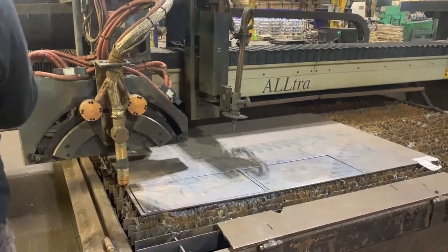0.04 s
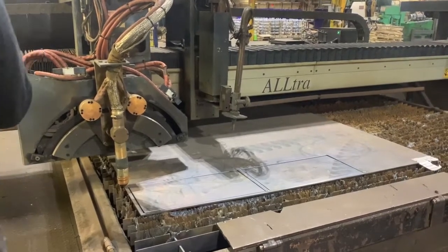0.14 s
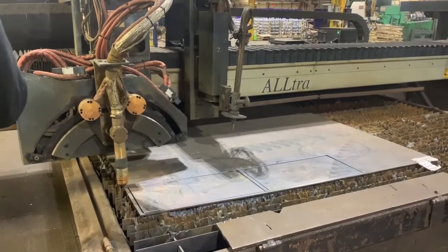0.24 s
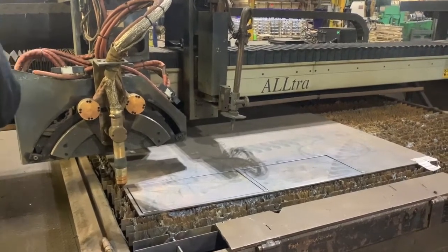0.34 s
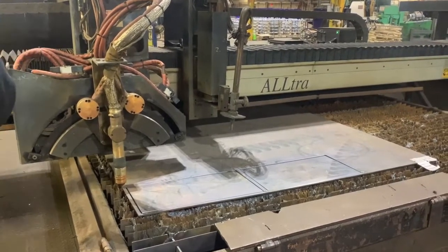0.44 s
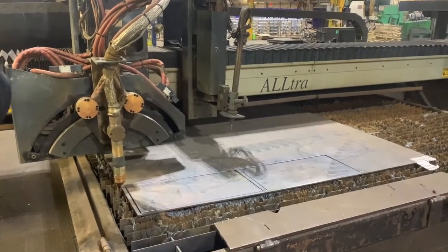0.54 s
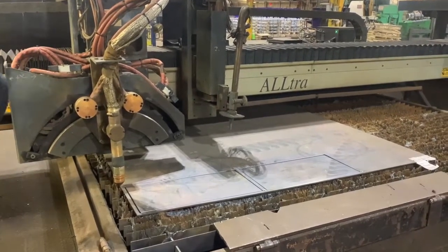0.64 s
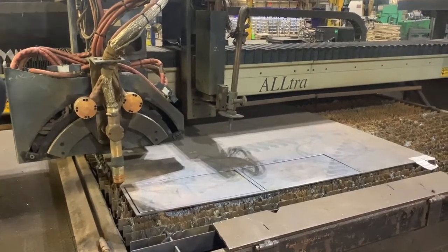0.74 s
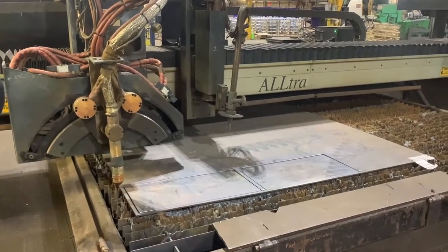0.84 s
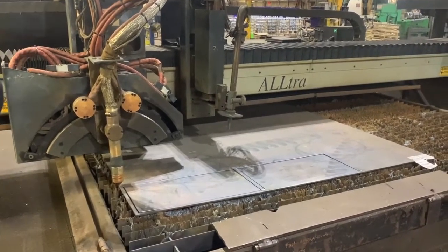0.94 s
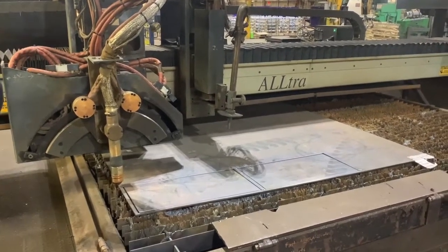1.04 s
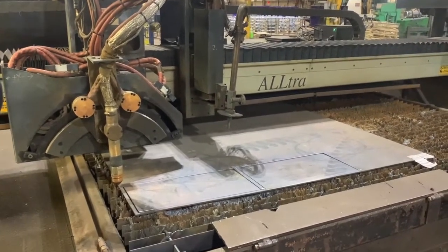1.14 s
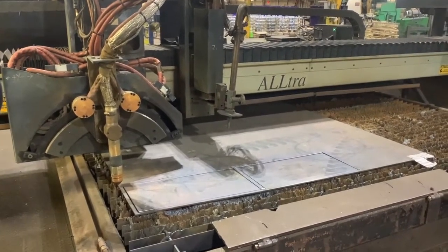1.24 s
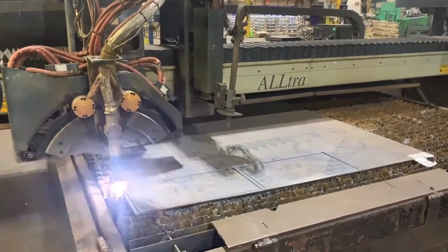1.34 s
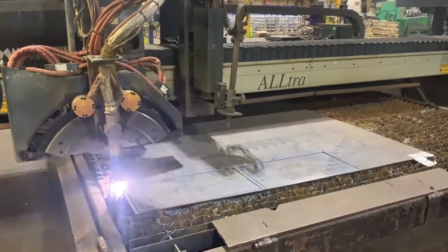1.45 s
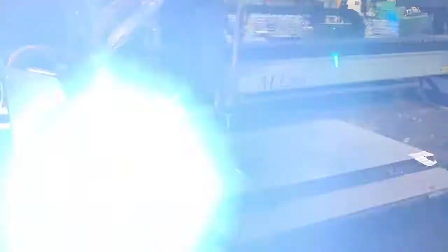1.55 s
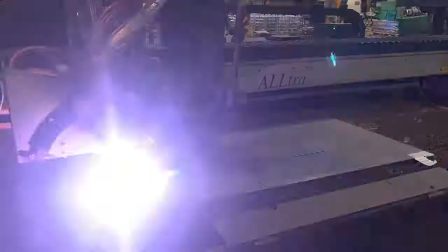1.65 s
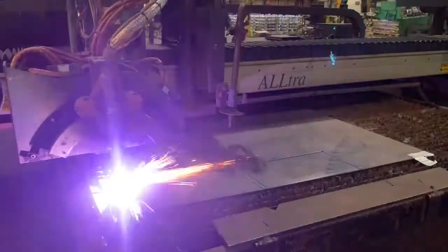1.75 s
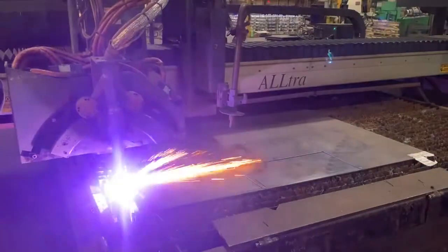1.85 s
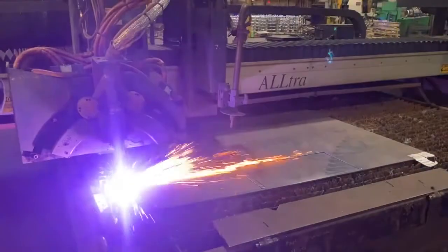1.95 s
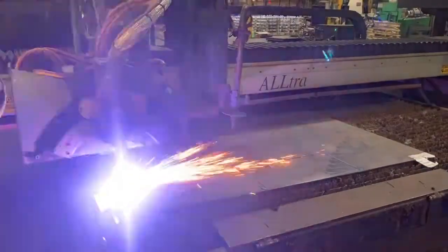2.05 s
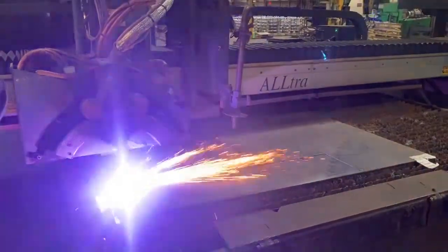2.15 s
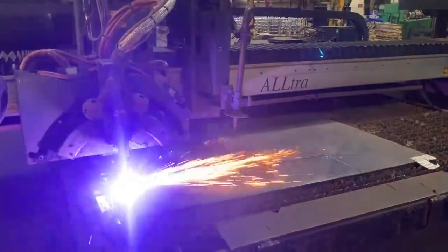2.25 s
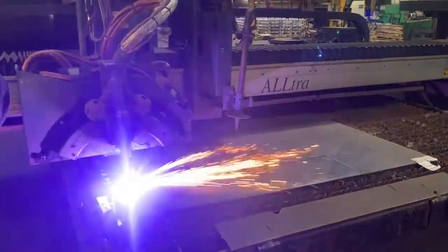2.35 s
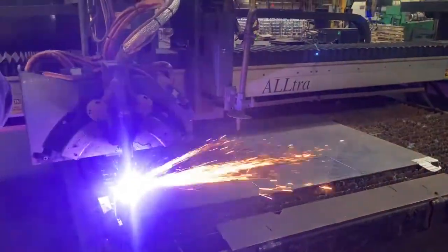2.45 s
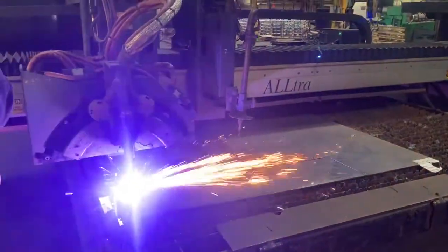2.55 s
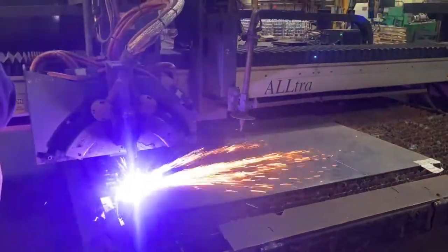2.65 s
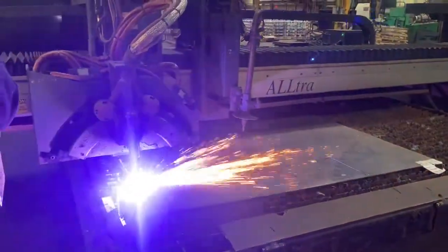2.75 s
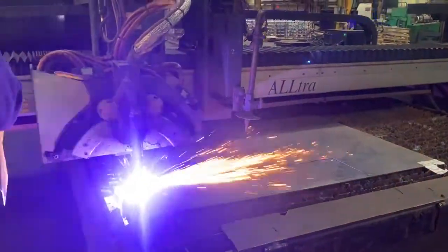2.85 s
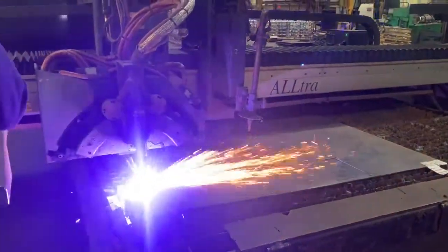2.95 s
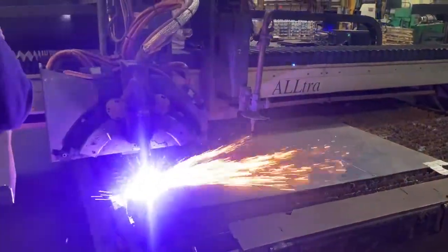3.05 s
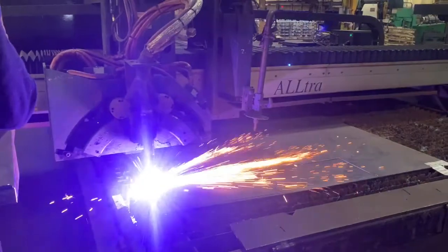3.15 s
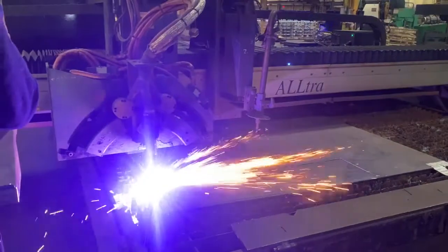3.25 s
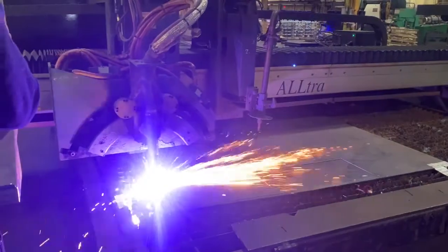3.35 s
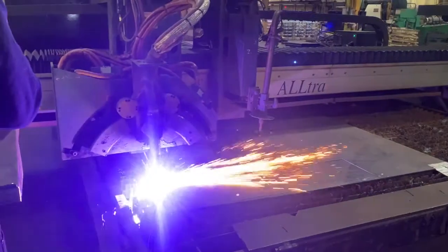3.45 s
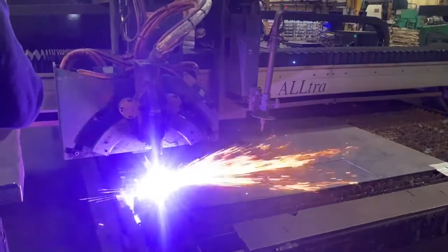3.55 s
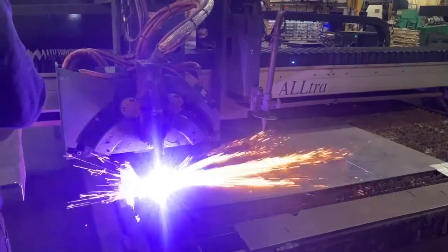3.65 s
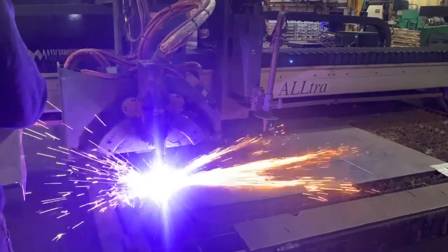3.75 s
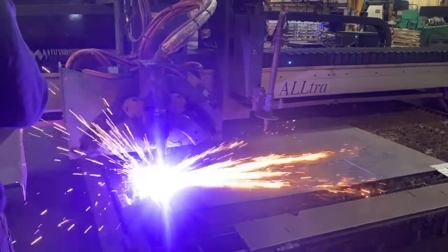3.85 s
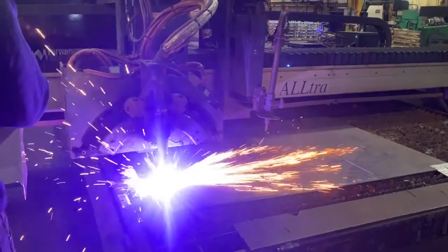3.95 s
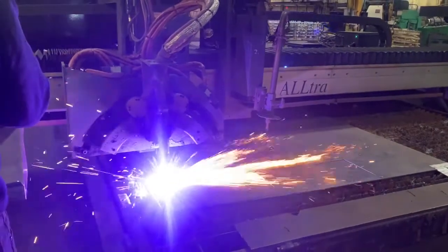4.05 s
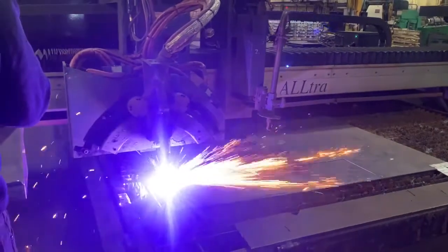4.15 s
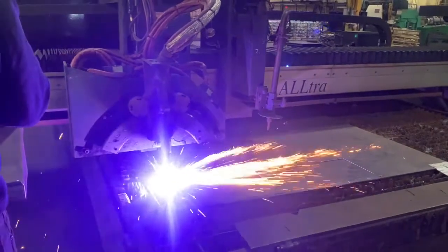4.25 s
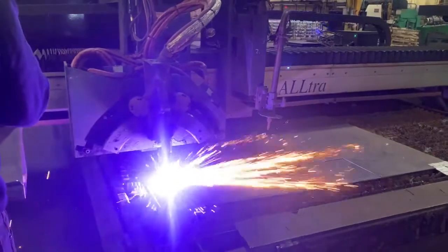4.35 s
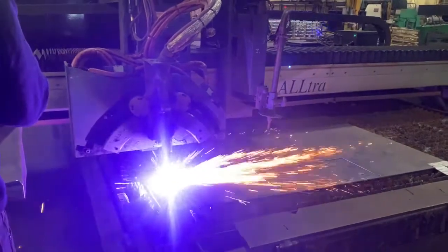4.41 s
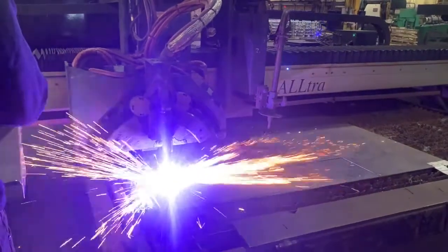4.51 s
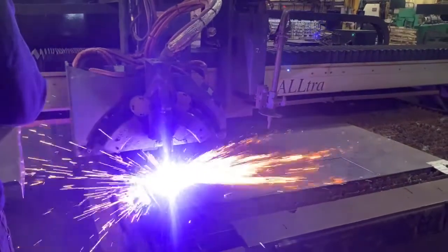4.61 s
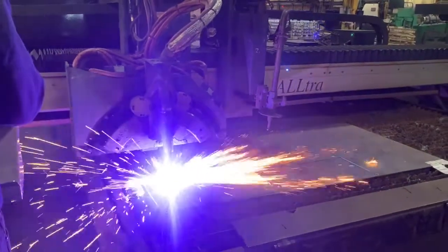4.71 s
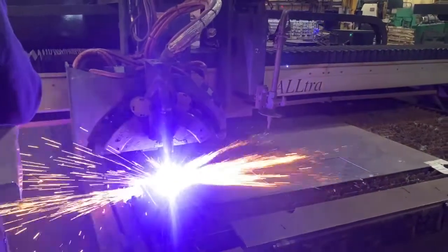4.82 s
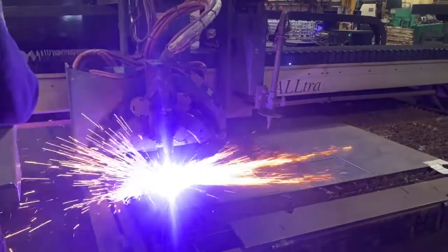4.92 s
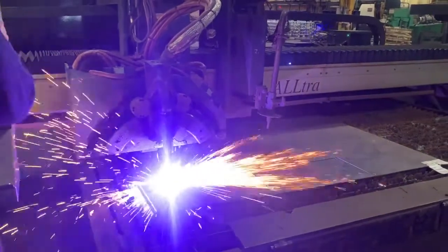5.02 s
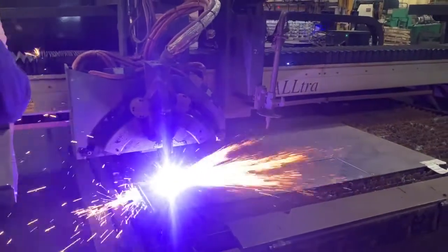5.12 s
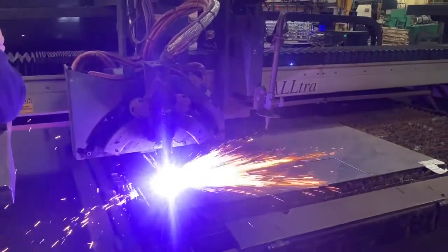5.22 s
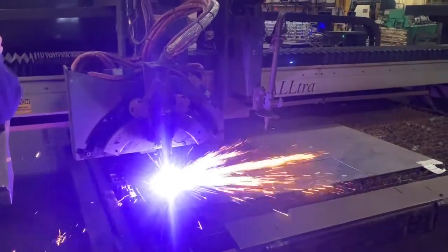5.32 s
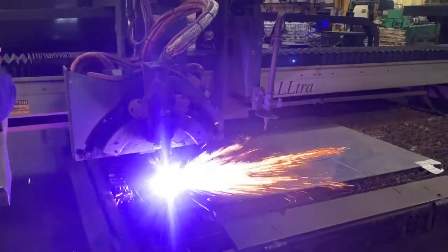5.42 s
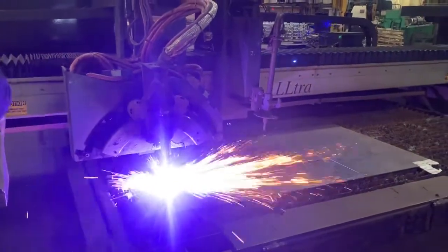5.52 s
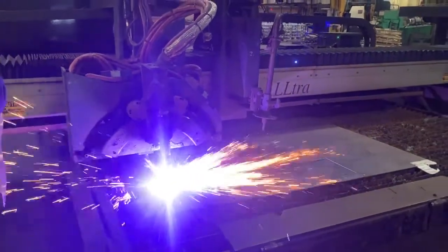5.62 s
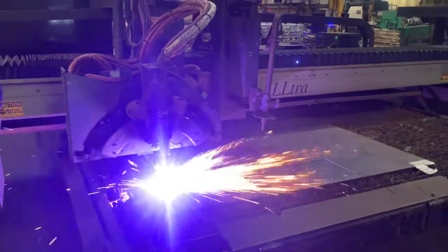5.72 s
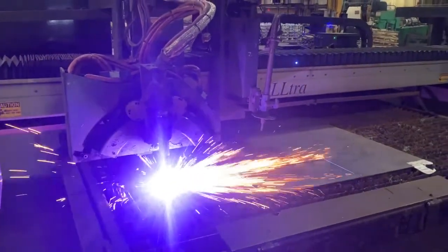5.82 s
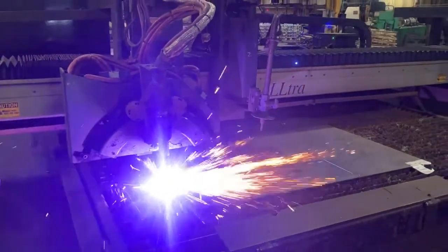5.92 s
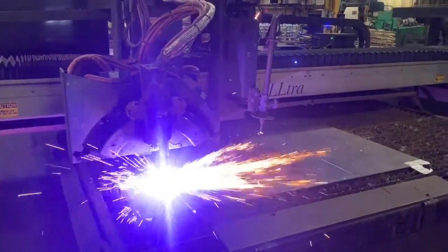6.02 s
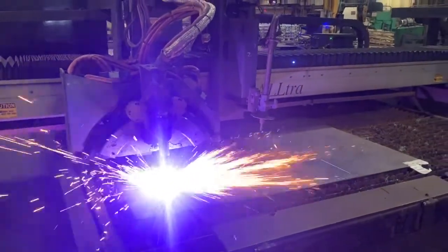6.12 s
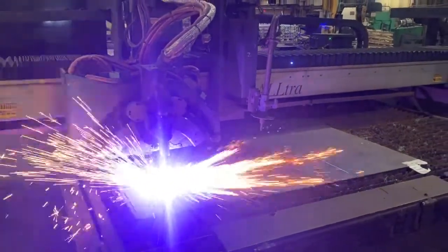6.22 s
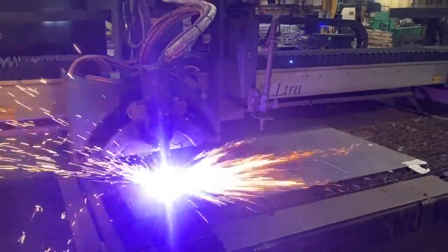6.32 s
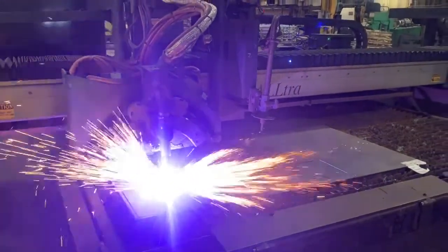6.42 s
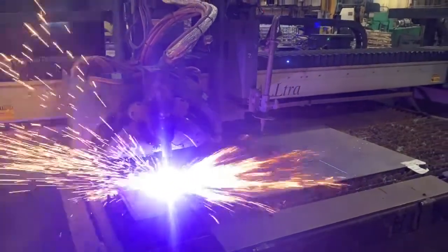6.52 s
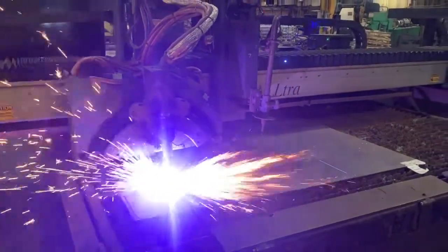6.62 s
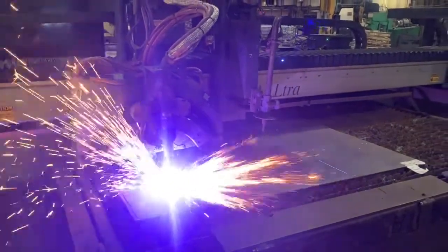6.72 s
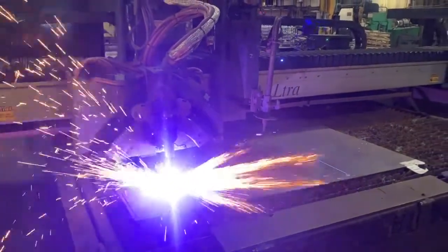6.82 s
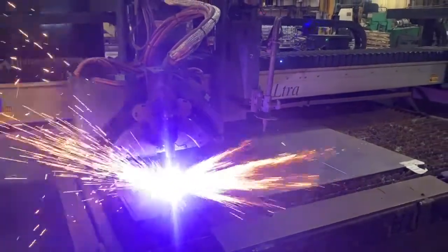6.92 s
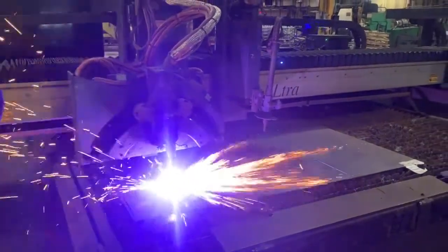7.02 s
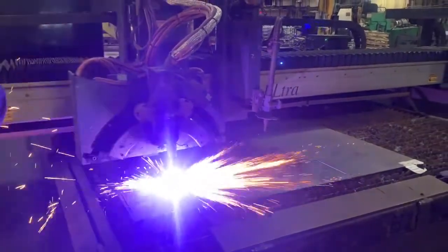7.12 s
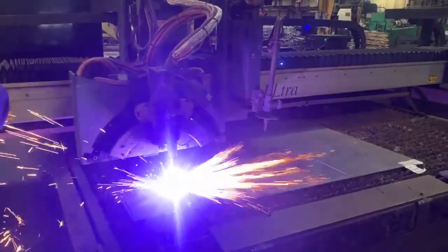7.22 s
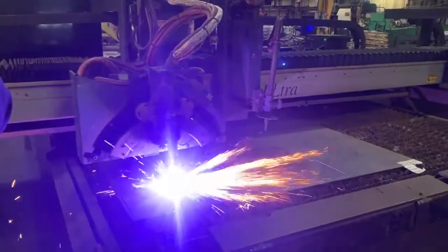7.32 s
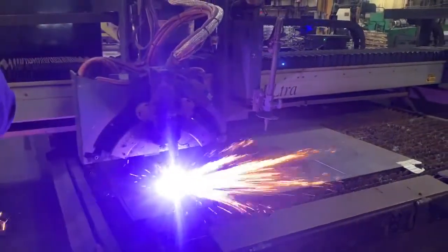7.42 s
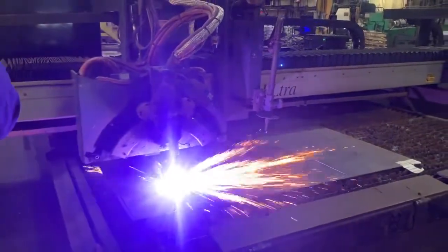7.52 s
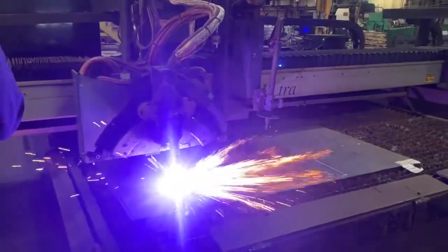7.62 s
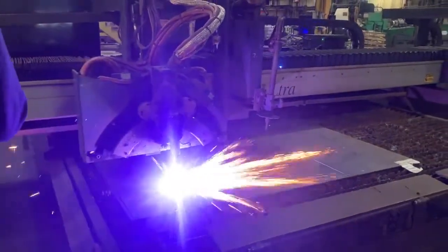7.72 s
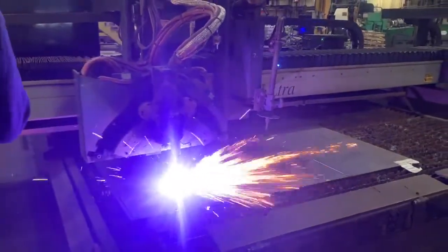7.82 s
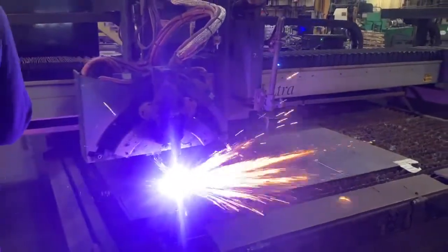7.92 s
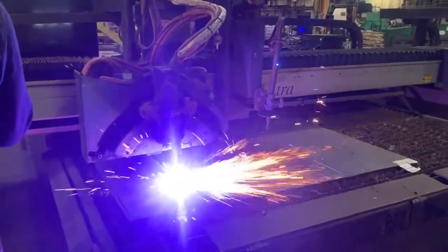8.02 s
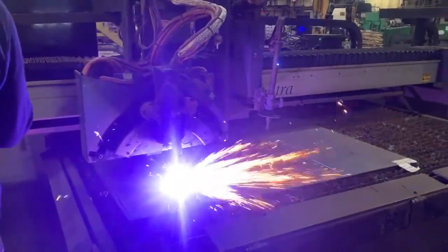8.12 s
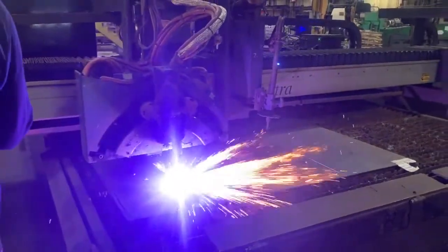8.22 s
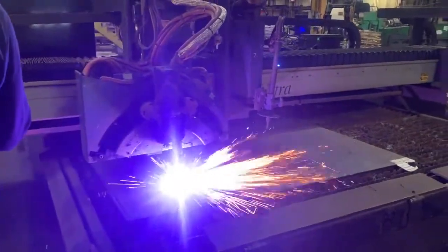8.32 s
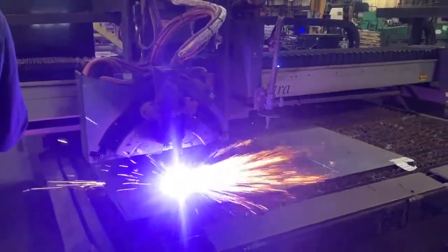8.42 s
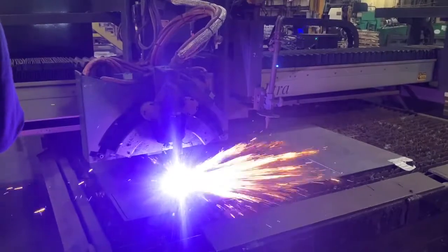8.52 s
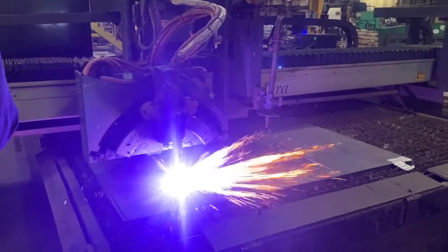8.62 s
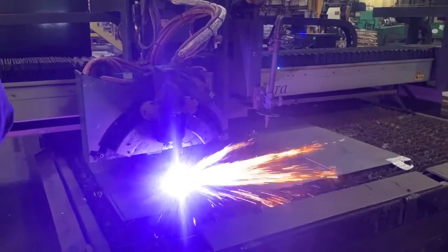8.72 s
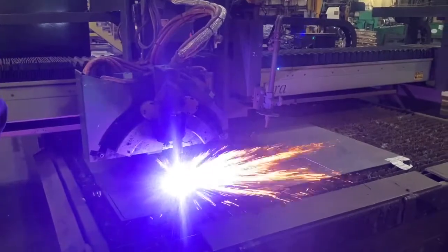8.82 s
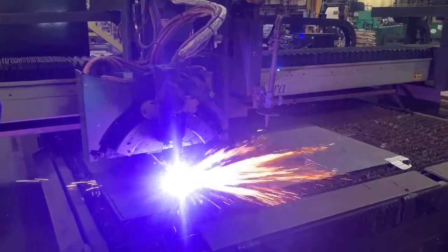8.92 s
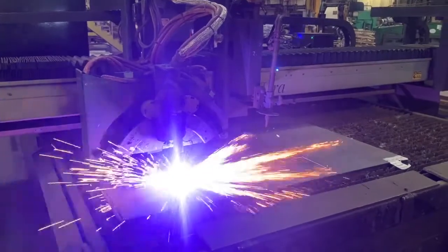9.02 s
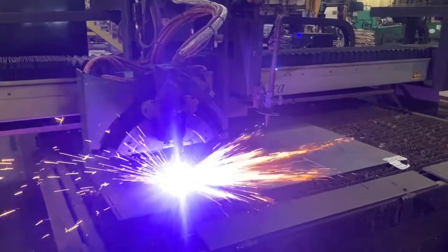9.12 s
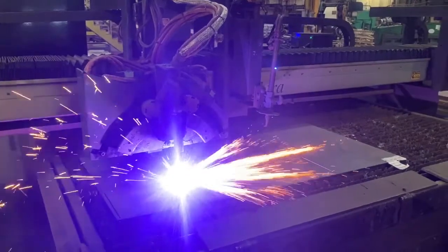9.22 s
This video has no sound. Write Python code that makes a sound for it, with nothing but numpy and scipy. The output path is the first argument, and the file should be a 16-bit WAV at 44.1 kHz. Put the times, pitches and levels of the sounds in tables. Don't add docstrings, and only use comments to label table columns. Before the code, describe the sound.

Cold gas hisses from a nozzle over deep machine rumble while a motor whine swells and stops. The torch ignites with an abrupt, splashy blast, uneven at first, then cuts steel plate continuously: sharp airy hiss, a shrill buzzing squeal and a faint hollow roar. One soft slag thud comes late. Indoor workshop, small stereo device nearby, automatic gain pushing the rumble down.

```python
import sys
import numpy as np
from scipy import signal
from scipy.fft import rfft, irfft, next_fast_len
from scipy.io import wavfile
from scipy.ndimage import uniform_filter1d

SR = 44100
rng = np.random.default_rng(int(sys.argv[2]) if len(sys.argv) > 2 else 0)


def convert_level_to_amplitude(level_db):
    exponent = np.asarray(level_db, float) / 20
    return 10 ** exponent


def dump_mix(stems):
    frames = np.atleast_2d(stems).T
    limited = np.clip(frames, -1, 1)
    pcm = np.round(limited * 32767).astype(np.int16)
    wavfile.write(sys.argv[1], SR, pcm)


N = 408366
TIME = np.arange(N) / SR
HZ = np.fft.rfftfreq(1024, 1 / SR)
FRAMES = np.arange(N // 256 + 5) * 256 / SR
STRIKE_S, PIERCED_S = 1.307, 3.4
CUT_POWER_DB = -38.5


def evened(x):
    return x / np.sqrt(np.mean(x ** 2) + 1e-20)


def curve(rows, t=TIME):
    s, *columns = np.transpose(rows)
    return [np.interp(t, s, c) for c in columns]


def wander(t, seconds):
    span = max(round(seconds / t[1]), 1)
    drift = uniform_filter1d(rng.standard_normal(len(t)), span)
    return evened(uniform_filter1d(drift, span))


def colour(points):
    f, db = np.transpose(points)
    at, f = np.log(HZ + 1), np.log(f)
    beyond = np.maximum(f[0] - at, 0) + np.maximum(at - f[-1], 0)
    return (np.interp(at, f, db) - 14 * beyond)[:, None]


def noise(field_db, patchy_db):
    a, b, c, d, patches = rng.standard_normal((len(FRAMES), 513, 5)).T
    patches = evened(uniform_filter1d(uniform_filter1d(patches, 14, 0), 10, 1))
    gain = convert_level_to_amplitude(field_db + 0 * patches)
    gain = gain / np.sqrt((gain ** 2).mean(0)) * convert_level_to_amplitude(patchy_db * patches)
    spectra = np.array([a + 1j * b, c + 1j * d]) * gain
    return evened(signal.istft(spectra, nperseg=1024, noverlap=768)[1][:, :N])


def fuzz(hz, width_hz):
    size = next_fast_len(N)
    f = np.fft.rfftfreq(size, 1 / SR)
    a, b = rng.standard_normal((2, 2, len(f)))
    peak = (a + 1j * b) / (1 + (2 * (f - hz) / width_hz) ** 2)
    return evened(irfft(peak, size)[:, :N])


def echoes(x, t60, wet_db):
    t = np.arange(SR // 4) / SR
    signs = rng.choice([-1., 1.], (2, len(t)))
    sparse = rng.random((2, len(t))) < .04
    taps = signs * sparse * convert_level_to_amplitude(-60 * t / t60) * (t > .002)
    taps = taps / np.linalg.norm(taps, axis=1, keepdims=True)
    wet = signal.fftconvolve(x[None], taps, axes=1)[:, :N]
    return np.array([x + convert_level_to_amplitude(wet_db) * wet[0], wet[1]])


def shop():
    # pitch_hz, level_db (per Hz)
    rumble_colour = [(25, -13.7), (40, -2), (56, 4), (75, -0.7), (105, -9.5), (145, -13.5), (220, -12.5),
                     (300, -15), (450, -23.5), (650, -23), (900, -26.5), (1300, -32.5), (2000, -22),
                     (3000, -38.5)]
    # pitch_hz, level_db (rms)
    fan_lines = [(57, -31), (118.4, -50), (172.3, -40), (204.6, -45), (371.4, -48), (748.3, -53),
                 (1125, -54)]
    # time_s, level_db
    whine_swell = [
        (.15, -60),
        (.35, -48),
        (.45, -40),
        (.8, -36),
        (.9, -56),
        (1.05, -62),
    ]
    lines = sum(convert_level_to_amplitude(db) * fuzz(hz, width_hz=7.5) for hz, db in fan_lines)
    rumble = convert_level_to_amplitude(-32.5) * noise(colour(rumble_colour), patchy_db=1) + convert_level_to_amplitude(-1) * lines
    whine = convert_level_to_amplitude(curve(whine_swell)[0]) * np.sin(2 * np.pi * 1484 * TIME)
    after = TIME - STRIKE_S
    duck_db = -22.5 * np.clip(after / 0.1, 0, 1)
    sag_db = -0.65 * np.clip(after, 0, 4.5)
    return convert_level_to_amplitude(-27 + duck_db + sag_db) * evened(rumble) + echoes(whine, 0.48, wet_db=-30)


def knock():
    # start_s, level_db, pitch_hz
    slag_drops = [
        (8.551, -38.5, 632),
    ]
    out = np.zeros(N)
    for s, db, hz in slag_drops:
        t = np.maximum(TIME - s, 0)
        modes = np.sin(2 * np.pi * hz * t) + 0.84 * np.sin(2 * np.pi * 305 * t)
        out += convert_level_to_amplitude(db - 60 * t / 0.14) * modes
    return echoes(out, 0.27, wet_db=-5)


def power_db():
    # time_s, jet_power_db
    pierce = [
        (1.307, -16),
        (1.37, -26.5),
        (1.42, -21),
        (1.455, -31),
        (1.5, -24.5),
        (1.6, -26),
        (1.635, -33.5),
        (1.73, -32),
        (2.0, -28.5),
    ]
    # time_s, jet_power_db
    travel = [(2.08, -33.5), (2.84, -34), (3.1, -31.5), (3.3, -34.5), (3.46, -37), (3.6, -35), (3.95, -37),
              (4.15, -36.5), (5.0, -35.5), (5.6, -37), (5.9, -32.5), (6.5, -36.5), (6.8, -35), (7.0, -37),
              (7.6, -36.5), (8.3, -38.5), (8.9, -37), (9.15, -34.5)]
    lit = np.clip((TIME - STRIKE_S) / .003 + .5, 0, 1)
    gas_db = -28.5 + 0.5 * np.exp(-(TIME / 0.22) ** 2)
    arc_db = curve(pierce + travel)[0]
    spit_db = 6 * np.exp(-((TIME - 1.9) / 0.0035) ** 2)
    return (1 - lit) * gas_db + lit * arc_db + spit_db


def roar():
    # pitch_hz, level_db (per Hz)
    edge_colour = [(150, -9.5), (250, -14.5), (350, 1), (450, -23.5), (600, -6), (750, -2), (950, -0.5),
                   (1150, 1.6), (1350, -25.5), (1700, -1.5), (2100, -0.5)]
    # pitch_hz, level_db (per Hz)
    deep_colour = [(150, -4), (250, -13.5), (350, -1.5), (450, -18), (600, -3.5), (750, -4), (950, -3),
                   (1150, -9), (1350, -12), (1700, -3), (2100, 0.8)]
    # pitch_hz, level_db (per Hz)
    slat_colour = [(150, -4), (250, -2), (350, -4.5), (450, -11), (600, 1.5), (750, 3), (950, -5.5),
                   (1150, -6), (1350, -7), (1700, -2.5), (2100, 0)]
    edge = np.clip((3.5 - FRAMES) / 0.97, 0, 1)
    slat = np.clip((FRAMES - 7.4) / 0.86, 0, 1)
    deep = 1 - edge - slat
    field = edge * colour(edge_colour) + deep * colour(deep_colour) + slat * colour(slat_colour)
    deep_db = -44 - 1.77 * np.clip(FRAMES - 3.5, 0, 2.1)
    place_db = np.interp(TIME, FRAMES, edge * -38.5 + deep * deep_db + slat * -46)
    cut_db = place_db + 0.19 * (power_db() - CUT_POWER_DB) * (TIME > 2.1)
    cold_db, surge_db = -46.5, wander(TIME, 0.19)
    level_db = np.where(TIME < STRIKE_S, cold_db, cut_db) + surge_db
    return convert_level_to_amplitude(level_db) * noise(field, patchy_db=2.0)


def nozzle_whistle():
    # time_s, level_db
    whistle_fade = [
        (0, -29),
        (.2, -25.5),
        (.3, -46),
        (.4, -70),
    ]
    return convert_level_to_amplitude(curve(whistle_fade)[0]) * fuzz(13050, width_hz=350)


def warble():
    rate_hz = 49.5 + 3 * evened(uniform_filter1d(rng.standard_normal(N), 2500))
    return np.sin(2 * np.pi * np.cumsum(rate_hz) / SR)


def jet(swing):
    # pitch_hz, level_db (per Hz)
    gas_colour = [(1800, -11), (2300, -9), (2900, -10), (3600, -9.5), (4700, -17), (5600, -4), (6400, -6),
                  (7200, -2.5), (8300, -2), (9400, -2.5), (10500, -5.5), (12700, 1), (14000, -1.5),
                  (15400, 1)]
    # pitch_hz, level_db (per Hz)
    strike_colour = [(1800, -21.5), (2300, -21), (2900, -8), (3600, -23), (4700, -2.5), (5600, -1.5),
                     (6400, -3.5), (7200, -2), (8300, -1.5), (9400, -6), (10500, 1.5), (12700, 2),
                     (14000, -2), (15400, -2.5)]
    # pitch_hz, level_db (per Hz)
    cut_colour = [(1800, -18.5), (2300, -25), (2900, -20), (3600, -14), (4700, -9), (5600, -10),
                  (6400, -6.5), (7200, -4.5), (8300, -2), (9400, -5.5), (10500, -5), (12700, 1),
                  (14000, -3.5), (15400, -4)]
    cold = FRAMES < STRIKE_S
    settled = np.clip((FRAMES - STRIKE_S) / (PIERCED_S - STRIKE_S), 0, 1)
    arc = (1 - settled) * colour(strike_colour) + settled * colour(cut_colour)
    body_db = np.where(cold, -3, 0.5) + 2 * wander(FRAMES, 0.063)
    below = 1 / (1 + (HZ[:, None] / 8000) ** 6)
    field = np.where(cold, colour(gas_colour), arc) + below * body_db
    hiss = noise(field, patchy_db=1.5)
    splash = (TIME > STRIKE_S) * np.clip((PIERCED_S - TIME) / 0.33, 0, 1)
    dull = signal.sosfilt(signal.butter(6, 6000, fs=SR, output='sos'), hiss[1])
    hiss = np.array([hiss[0], hiss[1] + convert_level_to_amplitude(8) * splash * dull])
    flutter_db = 0.38 * evened(uniform_filter1d(rng.standard_normal(N), 900))
    flutter_db = flutter_db + 0.24 * swing * (TIME > 1.6)
    return convert_level_to_amplitude(power_db() + 8 + flutter_db) * hiss


def squeal(swing):
    # time_s, swing_percent (of pitch)
    swing_depth = [(1.74, 0.41), (1.86, 4.9), (2.4, 7.4), (3.2, 4.4), (3.36, 1.27), (3.5, 3.2), (4.05, 3.2),
                   (4.14, .8), (4.6, 2.15), (4.75, 1.5), (5.46, 1.8), (5.56, 1.09), (6.6, 0.97),
                   (6.95, 1.3), (7.26, .7), (8.1, 4.2), (8.8, 1.15), (9.26, 1.8)]
    age = np.maximum(TIME - 1.62, 0)
    catch_hz, steady_hz, creep_hz_per_s = 4010, 4195, 9
    hz = steady_hz + (catch_hz - steady_hz) * np.exp(-age / .8) + creep_hz_per_s * age
    shake = evened(uniform_filter1d(rng.standard_normal((2, N)), 150))
    bend = curve(swing_depth)[0] / 100 * (0.68 * swing + .55 * wander(TIME, .003))
    turns = 2 * np.pi * np.cumsum(hz * (1 + bend + 0.006 * shake[0])) / SR

    power = power_db()
    chirp_db = 9 * np.exp(-((TIME - 1.686) / 0.043) ** 2)
    level_db = -31.5 + 0.1 * (power - CUT_POWER_DB) + chirp_db
    octave_db = 2.5 + .5 * np.minimum(power + 36, 4) - 0.2 * age - chirp_db + 1.2 * wander(TIME, .05)
    tone = np.sin(turns) + convert_level_to_amplitude(octave_db) * np.sin(2 * turns) + convert_level_to_amplitude(-18) * np.sin(3 * turns)
    tremor_db = 0.37 * shake[1] + 0.27 * wander(TIME, 0.096)
    tone *= convert_level_to_amplitude(level_db + tremor_db) * np.clip(age / 0.035, 0, 1)
    return echoes(tone, 0.27, wet_db=-16.0)


def two_ports(sound):
    # pitch_hz, likeness (0-1), balance_db, lead_radians
    port_match = [(0, 1, -1.3, 0), (110, .99, -1.3, .2), (430, .75, .5, .5), (1010, .7, 5, .7),
                  (1380, .5, 0, .3), (1640, .6, -1, 2.2), (1950, .88, -1, 2.8), (2300, .9, -1, 3.8),
                  (2560, .75, -1, 6.4), (3010, .7, -1.5, 8.2), (3350, .88, 0, 6.4), (3850, .93, -1, 6.3),
                  (4150, .8, -5.5, 8.5), (4400, .88, -4, 9), (4750, .91, -2, 9.2), (5550, .88, -2.5, 9.9),
                  (6200, .8, -2, 12.3), (6890, .9, -1.5, 9.5), (8100, .6, -5, 11.9), (8960, .6, -2, 8.1),
                  (9800, .99, 0, 6.6), (10450, .99, 0, 5.9), (11350, .98, 0, 3.6), (12100, .98, 0, 2.7),
                  (13050, 1, 0, .35), (13750, 1, 0, -.35), (14600, .99, 0, -2.9), (15200, .99, 0, -3.3),
                  (15700, .93, 0, -3.9)]
    size = next_fast_len(N)
    f = np.fft.rfftfreq(size, 1 / SR)
    bass_cut = f ** 4 / np.sqrt(f ** 8 + 33.5 ** 8)
    direct, diffuse = rfft(sound, size) * bass_cut
    like, balance_db, lead = curve(port_match, f)
    like = np.clip(like, 0, 1)
    left = like * direct * np.exp(1j * lead) + np.sqrt(1 - like ** 2) * diffuse
    tilt = convert_level_to_amplitude(balance_db / 2)
    return irfft(np.array([left * tilt, direct / tilt]), size)[:, :N]


def scene():
    swing = warble()
    torch = roar() + nozzle_whistle() + jet(swing) + squeal(swing)
    return two_ports(shop() + knock() + torch)


def top_cut(x):
    return signal.sosfilt(signal.butter(12, 15760, fs=SR, output="sos"), x)


def record(dry):
    mix = np.tanh(dry / 0.96) * 0.92
    return top_cut(mix)


dry = scene()
out = record(dry)
dump_mix(out)
```